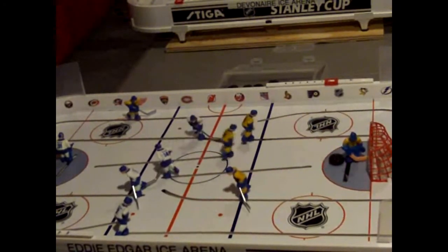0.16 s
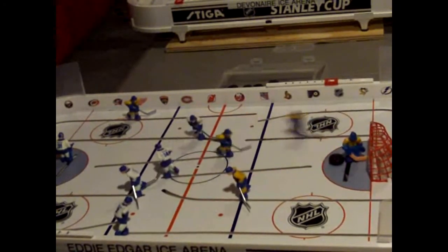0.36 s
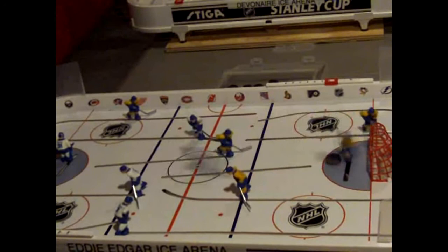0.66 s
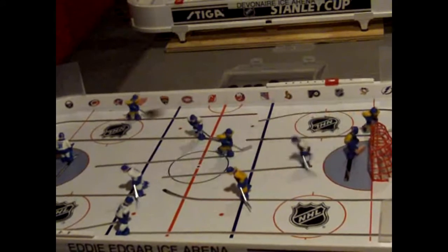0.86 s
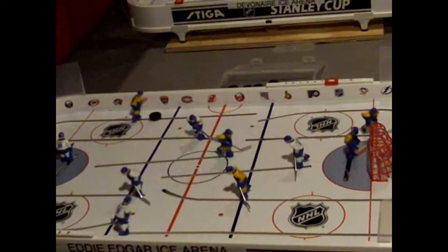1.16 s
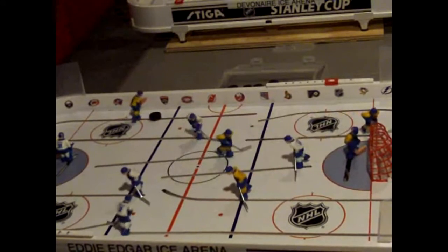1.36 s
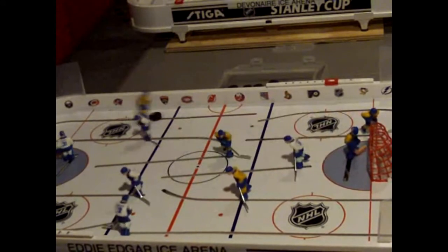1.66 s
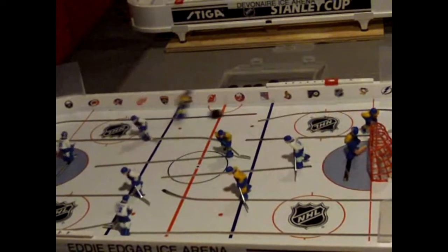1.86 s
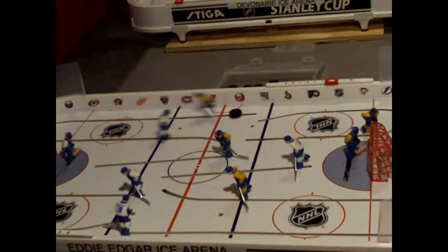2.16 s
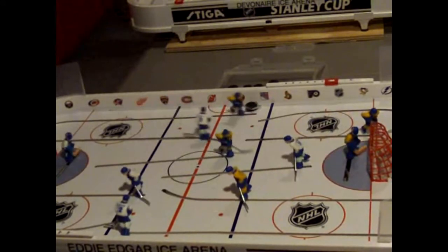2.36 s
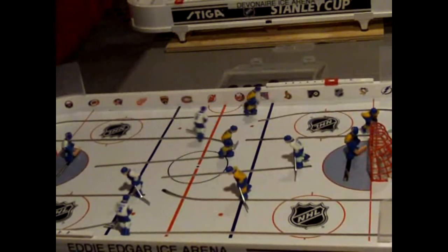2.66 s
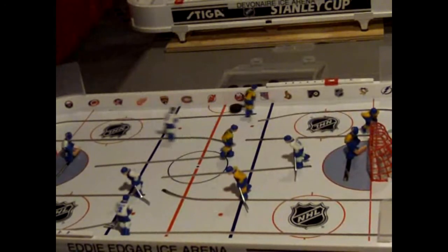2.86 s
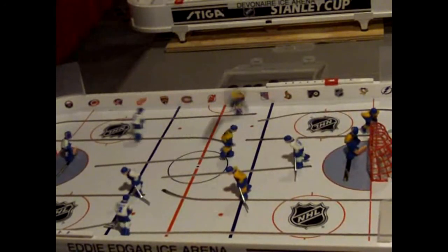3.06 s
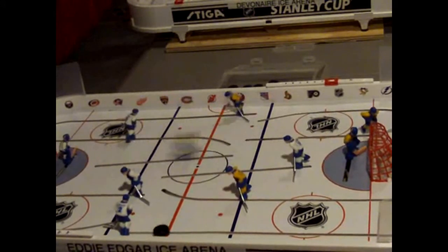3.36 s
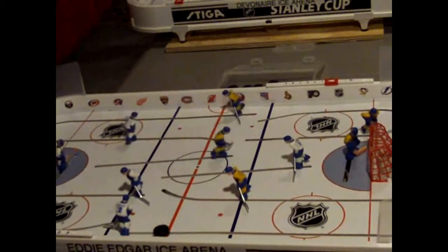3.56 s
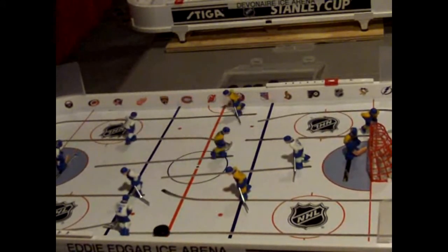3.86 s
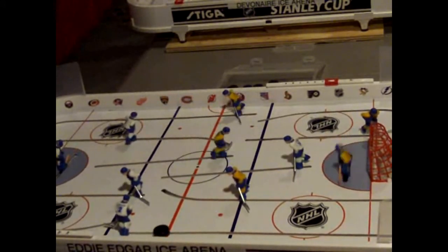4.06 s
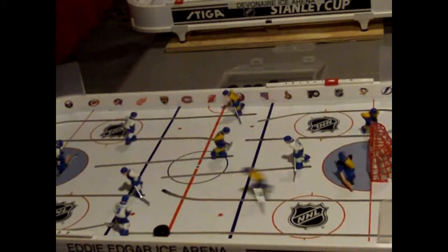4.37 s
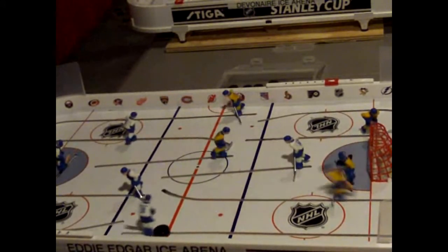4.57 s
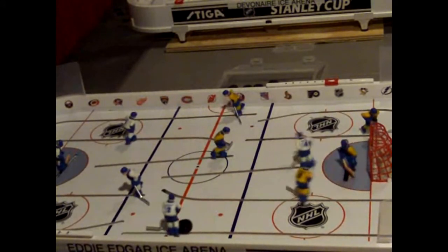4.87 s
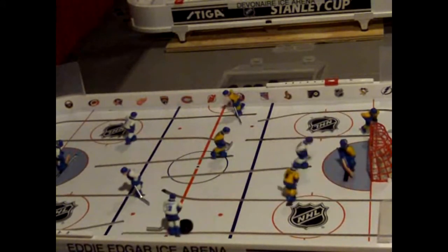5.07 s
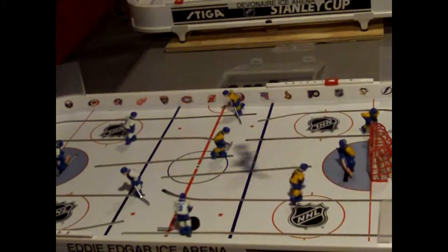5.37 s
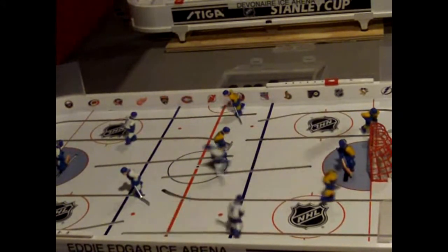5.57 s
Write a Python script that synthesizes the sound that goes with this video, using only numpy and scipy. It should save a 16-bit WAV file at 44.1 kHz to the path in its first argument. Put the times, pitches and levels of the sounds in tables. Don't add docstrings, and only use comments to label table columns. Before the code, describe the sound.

Plastic table hockey players clack, rattle and scrape in bursts, rods knock their stops and the puck slams hard, in a small quiet room.

```python
import sys
import numpy as np
from scipy import signal
from scipy.fft import rfft, irfft
from scipy.io import wavfile
from scipy.ndimage import uniform_filter1d

SR = 44100
rng = np.random.default_rng(int(sys.argv[2]) if len(sys.argv) > 2 else 0)


def level_to_linear(level):
    exponent = np.asarray(level, float) / 20
    return 10 ** exponent


def store_wav(level_fs):
    pcm = np.round(np.clip(np.atleast_2d(level_fs), -1, 1) * 32767)
    wavfile.write(sys.argv[1], SR, pcm.T.astype(np.int16))


N = 252693


def rms_one(x):
    return x / np.sqrt(np.mean(x ** 2) + 1e-20)


def shaped(x, points):
    points_hz, points_db = np.transpose(points)
    grid_hz = np.clip(np.arange(2049) * SR / 4096, 1, 14800)
    level_db = np.interp(np.log(grid_hz), np.log(points_hz), np.maximum(points_db, -70))
    cepstrum = irfft(np.log(level_to_linear(level_db)))
    cepstrum[1:2048] *= 2
    cepstrum[2049:] = 0
    impulse = irfft(np.exp(rfft(cepstrum)))
    return signal.fftconvolve(x, impulse)[:len(x)]


def ring(x, hz, t60_s):
    r, w = level_to_linear(-60 / (t60_s * SR)), 2 * np.pi * hz / SR
    return signal.lfilter([0, np.sin(w)], [1, -2 * r * np.cos(w), r * r], x + 1e-18)


def rattled(times_s, level_db, hz, t60_s):
    t = np.arange(SR // 4) / SR
    out = np.zeros(N + len(t))
    for s, gain in zip(times_s, np.atleast_1d(level_to_linear(level_db))):
        contact = level_to_linear(-60 * t / 0.01) * rng.standard_normal(len(t)) / 6
        at = int(s * SR)
        out[at:at + len(t)] += gain * ring(contact, hz, t60_s)
    return out[:N]


def grit(shape, per_s, spread_db):
    sizes = level_to_linear(spread_db * np.minimum(rng.exponential(1, shape), 4))
    sizes = sizes * rng.choice([-1, 1], shape)
    return rms_one(sizes * (rng.random(shape) < per_s / SR))


def thirds(x):
    thud_hz, snap_hz = 900, 4000
    cuts = [(thud_hz, "low"), ([thud_hz, snap_hz], "band"), (snap_hz, "high")]
    filters = [signal.butter(2, hz, kind, fs=SR, output="sos") for hz, kind in cuts]
    return np.array([signal.sosfilt(sos, v) for sos, v in zip(filters, x)])


def rink(force, ring_db):
    # (frequency [Hz], width [Hz], level [dB])
    resonances = [(557, 56, -20), (860, 26, -26.5), (1390, 110, -20), (1660, 300, -23.5), (2300, 250, -27),
                  (3990, 17, -58.5), (4620, 26, -66), (5100, 270, -33)]
    # (frequency [Hz], level [dB])
    colour = [(88, -51.5), (150, -41.5), (297, -9.5), (555, 8), (1140, 7.5), (1660, 7), (1940, 7.5),
              (2310, 8), (4230, 0), (9240, -8), (10600, -12), (14800, -21.5), (16000, -31)]
    out = force
    for hz, width_hz, level_db in resonances:
        r, w = np.exp(-np.pi * width_hz / SR), 2 * np.pi * hz / SR
        gain = (1 - r * r) / 2
        peak = signal.lfilter([gain, 0, -gain], [1, -2 * r * np.cos(w), r * r], force)
        out = out + level_to_linear(ring_db + 1.01 * level_db) * peak
    return shaped(out, colour)


def background():
    # (frequency [Hz], density [dB per Hz])
    hush_points = [(15, -74), (25, -18.5), (161, -25), (694, -2), (935, -4.5), (1890, -16), (5720, -16.5),
                   (7900, -17.5), (9300, -28.5), (14700, -28), (16000, -41.5)]
    # (offset from main line [frame rates], level [dB])
    whine_lines = [(-6, -79), (-5, -77), (-4, -76), (-3, -78), (-2, -77), (-1, -71), (0, -65), (1, -67.5),
                   (2, -75), (3, -78), (4, -79)]
    whine_hz, frame_hz = 7837.3, 59.85
    t = np.arange(N) / SR
    out = level_to_linear(-54) * rms_one(shaped(rng.standard_normal(N), hush_points))
    for step, level_db in whine_lines:
        phase = 2 * np.pi * (whine_hz + frame_hz * step) * t + step ** 2
        out = out + level_to_linear(level_db + 1.3) * np.sin(phase)
    return out


def room(x):
    t60_s = 0.29
    t = np.arange(SR // 2) / SR
    dull, bright = rng.standard_normal((2, len(t)))
    dull = signal.lfilter([.3], [1, -.7], dull) * level_to_linear(-60 * t / t60_s)
    bright = 0.6 * bright * level_to_linear(-60 * t / (0.66 * t60_s))
    tail = (dull + bright) * (t > .006)
    return signal.fftconvolve(x, tail / np.sqrt(np.sum(tail ** 2)))[:N]


def ticks():
    # (time [s], peak [dB], note [Hz], t60 [s])
    tick_events = [(.791, -33, 8200, .015), (.895, -32, 7800, .02), (1.402, -34, 6100, .04),
                   (1.439, -28, 7000, .03), (1.44, -34, 12200, .015), (1.659, -34, 8000, .015),
                   (1.684, -30, 8300, .02), (1.909, -38, 7700, .015), (2.231, -35, 6500, .03),
                   (5.501, -28, 9000, .015), (5.522, -21, 9500, .008), (5.527, -30, 11500, .008),
                   (5.556, -24, 10500, .008), (5.56, -26, 8500, .01), (5.585, -27, 10000, .008),
                   (5.612, -32, 10000, .03), (5.622, -27, 10500, .008), (5.646, -16, 14500, .008)]
    out = np.zeros(N)
    for s, peak_db, hz, t60_s in tick_events:
        for ratio in (1, 1.045):
            out += rattled([s], peak_db, hz * ratio, t60_s)
    return out


def rods():
    # (time [s], peak [dB], best excited pitch [Hz], fall away from it [dB per octave])
    ping_events = [
        (.1211, -38, 8700, 4),
        (.1605, -29, 9800, 25),
        (.1794, -45, 8700, 30),
        (.1994, -56, 10650, 10),
        (4.7416, -32, 9000, 20),
        (4.7474, -28, 10500, 20),
        (4.7644, -35, 7600, 23),
        (4.7994, -51, 9300, 30),
    ]
    # (frequency [Hz], level [dB], t60 [s])
    loose_modes = [(6450, -1, 0.22), (8400, -1, .04), (8700, -2, .07), (9020, -11, 0.062), (9900, -6, .09),
                   (9800, -4, .1), (10010, -7, 0.15), (11100, -8, .06), (12500, 1, .08), (14200, -3, .05),
                   (14700, 2, .04)]
    # (time [s], peak [dB])
    rod_hits = [
        (0.6866, -17),
        (0.6908, -17),
        (0.7352, -44),
    ]
    # (frequency [Hz], level [dB], t60 [s])
    struck_modes = [(5110, -15, 0.18), (6350, -4, 0.047), (7263, -1, 0.14), (7800, -9, 0.07),
                    (9530, -7, 0.0443), (10489, 11, 0.03), (11850, -7, 0.036), (12610, -29, 0.076)]
    ping_s, ping_db, best_hz, fall_db = np.array(ping_events).T
    hit_s, hit_db = np.array(rod_hits).T
    out = np.zeros(N)
    for hz, level_db, t60_s in loose_modes:
        mode_db = ping_db + level_db - fall_db * abs(np.log2(hz / best_hz))
        out += rattled(ping_s, mode_db - 2, hz, .5 * t60_s)
    for hz, level_db, t60_s in struck_modes:
        out += rattled(hit_s, hit_db + level_db + 4, hz, .35 * t60_s)
    return out


def boards():
    # ((time [s], peak [dB]), modes (frequency [Hz], level [dB],
    # t60 [s]))
    board_hits = [
        ((.812, -9), [(990, 10, 0.06), (1340, 12, 0.053), (1680, 15, 0.052), (2370, 9, 0.056), (2770, 16, 0.06), (3100, 10, .04)]),
        ((3.2122, -3), [(1390, 4, 0.3), (1660, 4, 0.25), (1520, -1, .25), (1825, 2, .1), (2250, 11, 0.06), (2840, -6, 0.15), (3900, -6, 0.06)]),
        ((5.6452, -10), [(1030, 8, 0.12), (1570, -2, 0.2), (1970, 2, .2), (2560, 10, .06), (2300, 1, .15), (5650, 4, 0.04)]),
        ((1.727, -16), [(818, -5, .2), (1370, 0, .2), (2170, 4, .2), (2380, 3, .15), (3100, -3, .15)]),
        ((1.929, -22), [(1460, -4, .1), (1940, -4, .1), (2510, 3, .12), (3380, -8, .1)]),
        ((2.885, -22), [(807, 0, .15), (1600, 0, .1), (2250, 4, .08), (3150, -4, .12)]),
        ((3.484, -24), [(1260, 0, .2), (1860, -2, .15), (3030, 2, .08)]),
        ((1.325, -20), [(1100, -2, .15), (2300, 0, .15), (3100, 0, .12)]),
                  ((.273, -26), [(620, 0, .2), (1250, 0, .2), (1850, -2, .15), (2500, -5, .12)]),
        ((.367, -29), [(620, -3, .15), (1560, 2, .2), (2300, -4, .1)]),
        ((.515, -31), [(630, 0, .2), (1300, -2, .15), (1700, -1, .15)]),
        ((2.075, -33), [(1150, 0, .2), (2400, -2, .15), (3400, -3, .1)]),
        ((2.382, -28), [(1250, 0, .12), (1750, -1, .12), (2500, 0, .12)]),
        ((2.421, -27), [(1200, 0, .15), (2320, 1, .15)]),
        ((4.135, -24), [(700, -2, .2), (1100, -1, .2), (1450, 0, .15), (2350, 0, .2)]),
    ]
    out = np.zeros(N)
    for (s, peak_db), modes in board_hits:
        for hz, level_db, t60_s in modes:
            out += rattled([s], peak_db + level_db, hz, min(0.31 * t60_s, .15))
    return out


def effort():
    # (time at full speed [s], speeding up [s], kept [s], scrape [dB], rumble [dB re scrape])
    strokes = [(0, .01, 0.016, -28, -13), (.28, 0.034, 0.022, -33.5, -4.5), (0.501, 0.11, 0.03, -36, -0.5),
               (.7, .1, 0.016, -25.5, -2.5), (.9, 0.34, 0.011, -27.5, -5.5), (1.0, .05, .12, -45, -5.5),
               (1.299, 0.03, 0.09, -32.5, -5.5), (1.496, 0.16, 0.0078, -16.5, -16.5),
               (1.602, 0.057, .19, -32, -9), (1.8, .05, .08, -38, -9), (2.0, .15, .3, -41.5, -5),
               (2.4, 0.26, 0.016, -35.5, -8), (2.8, 0.4, .03, -44.5, -12), (2.9, 0.056, .01, -36, -15.5),
               (3.101, 0.075, 0.18, -26, -11), (3.35, 0.067, 0.073, -36, -14),
               (3.496, 0.052, 0.0065, -30, 1.5), (4.1, 0.23, .01, -37, -21), (4.15, .05, 0.073, -37.5, -24),
               (4.3, 0.054, .44, -43.5, -9.5), (4.8, 0.054, .2, -51, -4), (5.11, 0.02, .11, -43, -3),
               (5.44, 0.02, .05, -49, 2.5), (5.512, 0.017, 0.061, -21, -7), (5.7, 0.21, 0.0045, -28.5, -29)]
    start_db, coast_db_s = -21.5, 168
    idle_db, idle_rumble_db = -49.5, -5.5
    hiss_db, hiss_per_db = -10.5, 0.1956
    t = np.arange(N) / SR
    scrape, rumble = level_to_linear(2 * idle_db), level_to_linear(2 * (idle_db + idle_rumble_db))
    for s, rise_s, kept_s, level_db, rumble_db in strokes:
        shape_db = start_db * np.maximum(s - t, 0) / max(rise_s, .005)
        shape_db = shape_db - coast_db_s * np.maximum(t - s - kept_s, 0)
        power = level_to_linear(2 * np.maximum(level_db + shape_db, -150))
        scrape = scrape + power
        rumble = rumble + power * level_to_linear(2 * rumble_db)
    rumble_db, scrape_db = 10 * np.log10([rumble, scrape])
    hiss = scrape_db + hiss_db + hiss_per_db * (scrape_db + 35.5)
    return np.array([rumble_db, scrape_db - 3, hiss])


def sliding():
    level_db = effort()
    lumps = signal.lfilter([1], [1, -.995], rng.standard_normal((3, N)))
    lumps_db = 1.5 * rms_one(lumps[1] + .5 * lumps)
    contacts = thirds(grit((3, N), per_s=4200, spread_db=-0.5))
    bands = [rms_one(rink(band, ring_db=13)) for band in contacts]
    friction = np.sum(bands * level_to_linear(level_db + lumps_db), axis=0)
    taps = grit(N, per_s=420, spread_db=3.8)
    dealt = rng.integers(0, 24, N)
    notes = np.zeros(N)
    for k, hz in enumerate(np.geomspace(650, 3800, 24)):
        notes += ring(taps * (dealt == k), hz, 42.0 / hz)
    return friction + .9 * rms_one(notes) * level_to_linear(level_db[1] - 0.5)


def of_kind(events, thud_db, t60_s):
    return [(s, peak_db, thud_db, snap_db, note_hz, t60_s) for s, peak_db, snap_db, note_hz in events]


def blows(events, rise_s, tick):
    # (ratio to its note, level [dB])
    overtones = [(1.027, -30.5), (1.75, -42), (0.579, -46)]
    rise_shares = [
        [3.0],
        [1.2],
        [.6],
    ]
    t = np.arange(SR // 4) / SR
    rise = np.minimum(t / (rise_s * np.array(rise_shares)), 1)
    first = tick * level_to_linear(-60 * t / 0.0009)
    chatter = grit((len(events), 3, len(t)), per_s=7700, spread_db=3.5)
    force = np.zeros((3, N + len(t)))
    for (s, peak_db, thud_db, snap_db, note_hz, t60_s), contacts in zip(events, chatter):
        band_t60_s = np.clip(t60_s, .01, .5) * np.array([[1.3], [1.0], [.8]])
        burst = contacts * (level_to_linear(-60 * t / band_t60_s) + first) * rise
        burst[1] += sum(level_to_linear(level_db) * ring(burst[1], ratio * note_hz, .021) for ratio, level_db in overtones)
        soft = np.clip(.1 - 0.013 * snap_db, 0, .85)
        burst[2] = signal.lfilter([np.sqrt(1 - soft ** 2)], [1, -soft], burst[2])
        band_db = np.array([[thud_db - 3], [-6], [snap_db + 6]])
        at = round(s * SR)
        force[:, at:at + len(t)] += burst * level_to_linear(peak_db + band_db)
    return rink(thirds(force[:, :N]).sum(axis=0), ring_db=12)


def sharp_contacts():
    # (time [s], peak [dB], snap [dB re peak], note [Hz])
    stops = [(0, -13.5, -9.5, 1320), (.12, -42.5, 5, 1370), (.3418, -25.5, -14, 1830),
             (.614, -36, -18, 1000), (.637, -23.5, -7.5, 1850), (1.0044, -29.5, -8, 1060),
             (2.2303, -24, -7.5, 1060), (3.04, -23.5, -18, 1040), (3.8152, -47, 3, 1910),
             (3.8276, -29.5, -25, 868.3), (3.8771, -35, -8, 837), (3.9029, -17.5, -16, 1690),
             (3.988, -22.5, -24, 1080), (4.7402, -30, -21, 776), (4.9717, -39, -9, 1160),
             (5.0175, -34.5, -19, 1050), (5.251, -28, -13.5, 766)]
    jolts = [
        (.141, -31.5, -5.5, 1840),
        (1.929, -19.5, -15, 2540),
        (3.0924, -16.5, -8.5, 990),
        (4.0248, -32, -17, 1940),
        (4.2692, -27.5, -12.5, 1010),
        (4.7198, -30, -12, 1890),
        (5.1004, -30, -16.5, 1150),
        (5.4278, -27.5, -34, 1370),
        (5.501, -18, -3, 1920),
    ]
    clacks = [(.1984, -38, -10, 1370), (.3651, -17.5, -32, 1570), (.3954, -28, -22, 1460),
              (.4275, -29.5, -19, 1370), (.8699, -13, -8.5, 1530), (1.0941, -28.5, -15, 2370),
              (1.113, -35, -11, 1800), (1.1535, -31, -18, 1860), (1.2301, -31, -12, 2960),
              (1.398, -35, -3, 2080), (1.4202, -14.5, -15, 1140), (1.6832, -15.5, -5, 1690),
              (2.1588, -30, -24, 1070), (2.5559, -22, -24, 1614), (2.668, -54, -13, 1830),
              (2.7386, -37, -6, 1060), (3.0644, -29.5, -1.5, 1090), (3.415, -32, -12, 2000),
              (3.6154, -34.5, -5.5, 2090), (3.6426, -36, -4.5, 1000), (3.7, -31, -17, 1520),
              (4.3545, -29.5, -27, 1160), (4.3954, -44, -22.5, 1110), (4.609, -34, -21, 1660),
              (4.9191, -36, -20, 1140)]
    wobbles = [(.2245, -33, 1, 1580), (.4609, -27.5, -8.5, 2360), (.5544, -26, -11, 840),
               (.8944, -22.5, -4.5, 1310), (1.264, -20.5, -9, 2380), (1.439, -15.5, -4.5, 1390),
               (1.8779, -36, -16, 1280), (1.906, -27, -16, 2430), (1.9826, -28, -22, 1150),
               (2.347, -28.5, -28, 2310), (2.808, -30.5, -30, 2260), (3.165, -19, -14, 1590),
               (4.133, -10.5, -26, 1360), (4.5135, -20, -23, 1500), (4.742, -47, 3, 2400),
               (5.16, -45, -3, 1500), (.79, -38, 3, 2490), (3.13, -24, -2, 1690), (2.016, -41, -14, 620)]
    shots = [
        (.6862, -7.5, -6.5, 1730),
        (.812, 5, -12, 1308),
        (3.2121, 3, -10.5, 1660),
        (5.6452, 2, -8, 1030),
    ]
    touches = [
        (.263, -31, -22, 1320),
        (.798, -28, 4.5, 2960),
        (3.192, -10.5, -15, 1290),
        (5.63, -13, -4, 1960),
        (1.659, -28, -2, 1500),
        (5.489, -31, -10, 1900),
        (5.465, -35, -4, 1900),
        (.824, -4, -10, 1700),
        (5.674, -14, -20, 2200),
    ]
    events = of_kind(stops, thud_db=-4, t60_s=0.081) + of_kind(jolts, thud_db=-1.6, t60_s=0.19)
    events += of_kind(clacks, thud_db=-13.5, t60_s=0.076) + of_kind(wobbles, thud_db=-21, t60_s=0.15)
    events += of_kind(shots, thud_db=-11, t60_s=0.092) + of_kind(touches, thud_db=-9, t60_s=0.051)
    return blows(events, rise_s=0.00021, tick=0.26)


def building_contacts():
    # (time [s], peak [dB], snap [dB re peak], note [Hz])
    shoves = [(.2695, -15, -17.5, 1266), (.5112, -14.5, -27, 1254), (.733, -17, -8, 1550),
              (1.458, -10, -10, 2300), (1.471, -8, -10, 2200), (1.499, -12, -14, 2000),
              (1.33, -15, -14, 2900), (3.505, -16, -22, 1260), (2.914, -22, -24, 1800),
              (1.75, -14, -22, 1500), (4.0651, -28, -29, 1970), (4.2144, -22, -29, 1880),
              (4.2948, -22, -10.5, 716), (5.2, -29, -13, 724), (5.54, -11, -12, 2170),
              (3.4855, -10, -24, 1470)]
    spins = [(.4988, -24, -8.5, 1550), (1.3175, -9.5, -13, 2730), (1.5369, -12.5, -13.5, 2320),
             (1.7255, -9, -18.5, 2190), (2.0702, -24, -12, 1190), (2.2901, -26.5, -27, 1150),
             (2.3794, -19, -17, 1730), (2.419, -18.5, -37, 2320), (2.884, -15, -27, 1600),
             (3.4725, -17, -7, 2370), (4.1587, -16, -21, 1073), (4.8377, -34.5, -15, 1150)]
    events = of_kind(shoves, thud_db=-2.5, t60_s=.12) + of_kind(spins, thud_db=-16.5, t60_s=0.22)
    return blows(events, rise_s=0.0034, tick=.05)


def scene():
    game = ticks() + rods() + boards() + sliding() + building_contacts() + sharp_contacts()
    no_bass = signal.butter(3, 230, "high", fs=SR, output="sos")
    game = signal.sosfilt(no_bass, game)
    return (game + level_to_linear(-14.5) * room(game) + background())[None]


def gain_control(x):
    knee_db, slope, recover_db_s, attack_s = -18, 0.2, 24, 0.0057
    ramp_db = recover_db_s * np.arange(N) / SR
    level_db = 10 * np.log10(uniform_filter1d(x ** 2, 256) + 1e-12)
    held_db = np.maximum.accumulate(level_db + ramp_db, axis=-1) - ramp_db
    r = np.exp(-1 / (attack_s * SR))
    cut_db = signal.lfilter([1 - r], [1, -r], slope * np.maximum(held_db - knee_db, 0))
    return x * level_to_linear(-cut_db)


def top_cut(x):
    return signal.sosfilt(signal.butter(12, 16110, fs=SR, output="sos"), x)


def record(dry):
    rail = .83
    top = signal.cheby2(12, 60, 16050, fs=SR, output="sos")
    bass = signal.butter(1, 170, "high", fs=SR, output="sos")
    clipped = np.clip(gain_control(dry), -rail, rail)
    mix = signal.sosfilt(np.r_[top, bass], clipped)
    return top_cut(mix)


dry = scene()
out = record(dry)
store_wav(out)
```